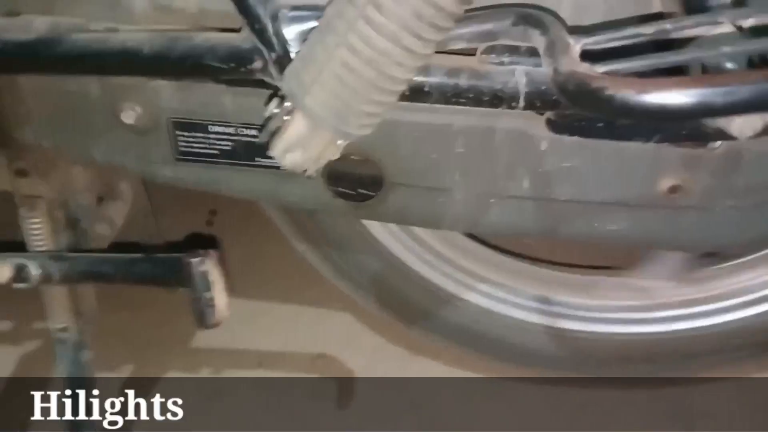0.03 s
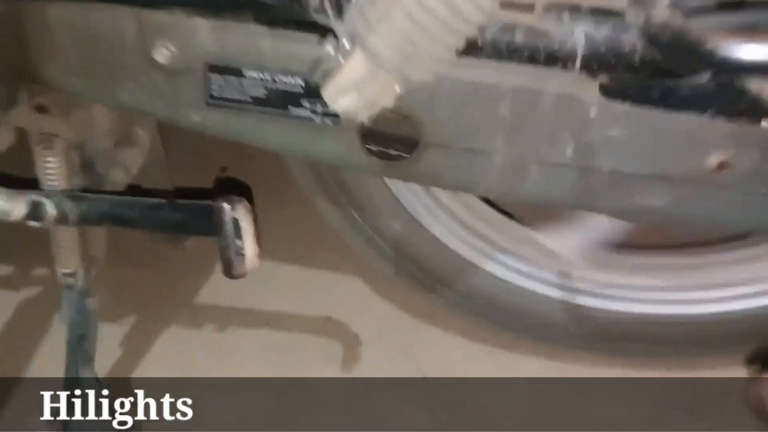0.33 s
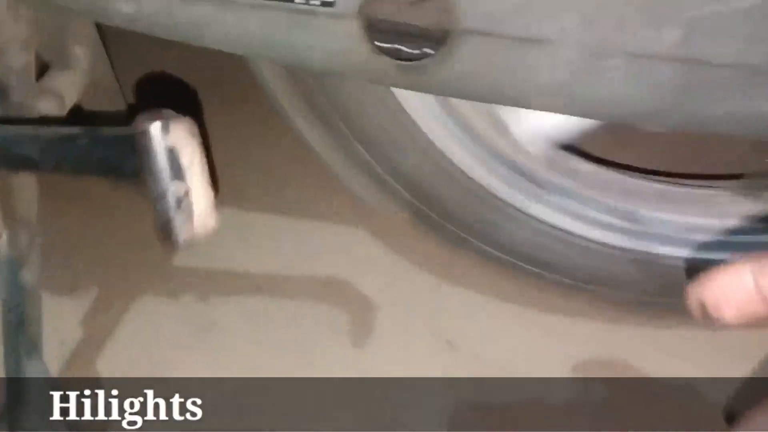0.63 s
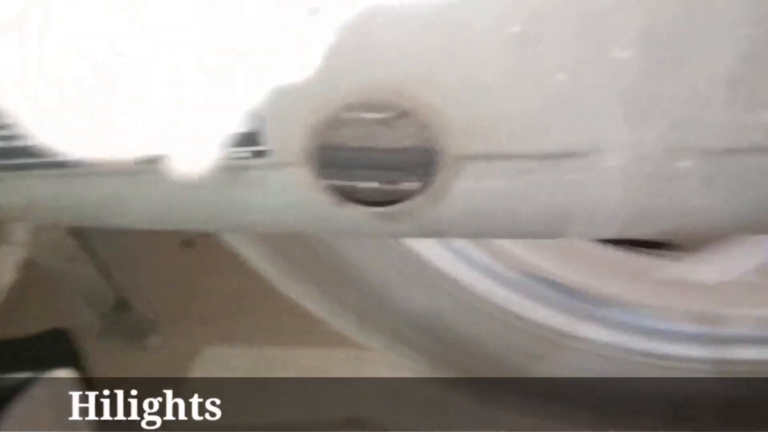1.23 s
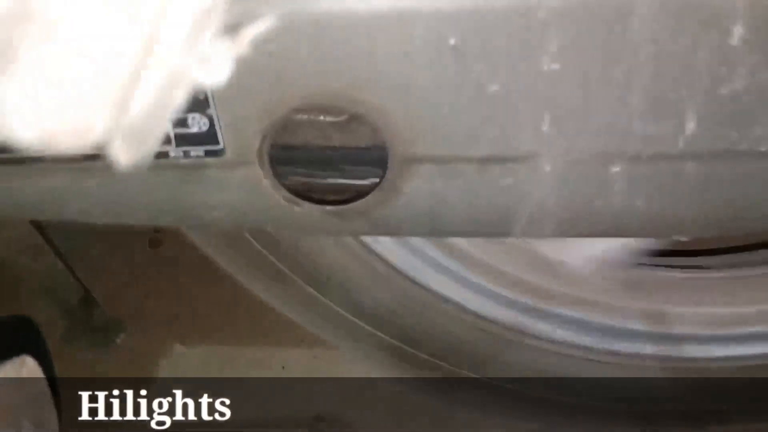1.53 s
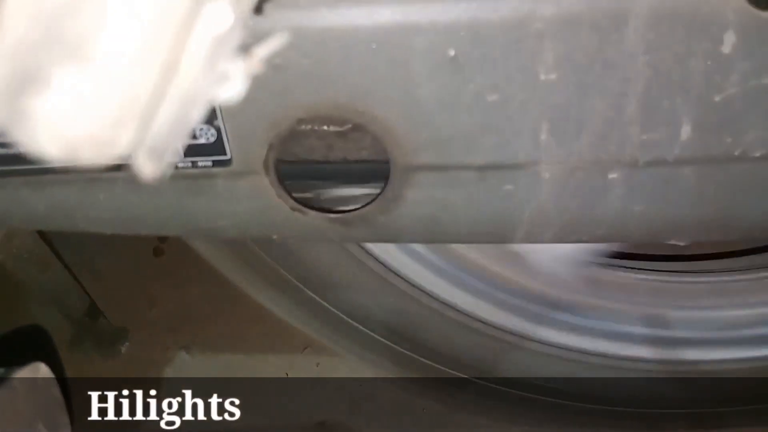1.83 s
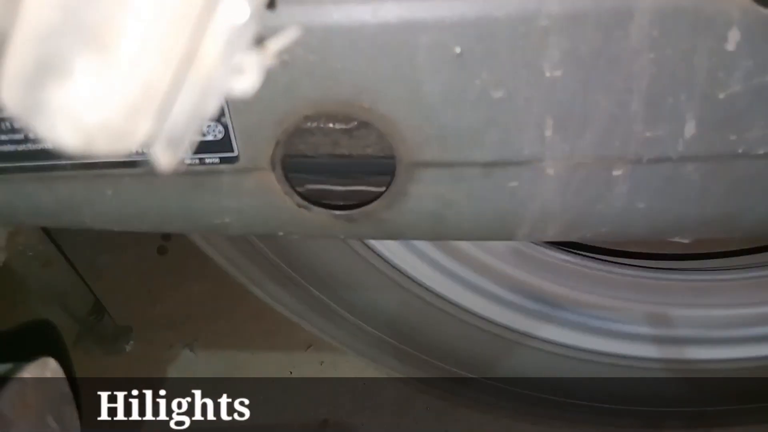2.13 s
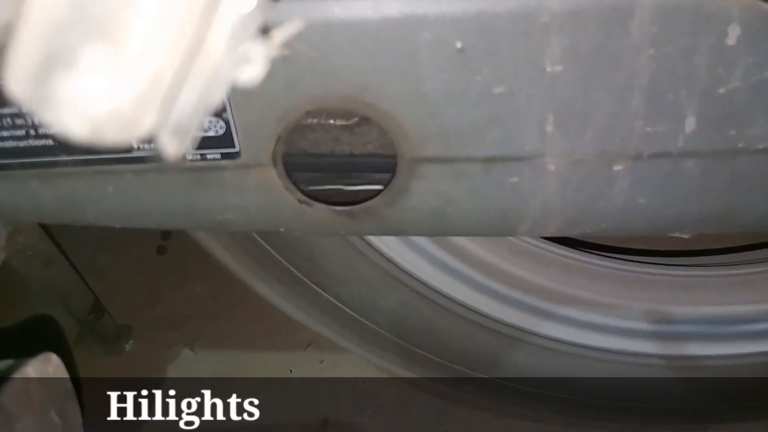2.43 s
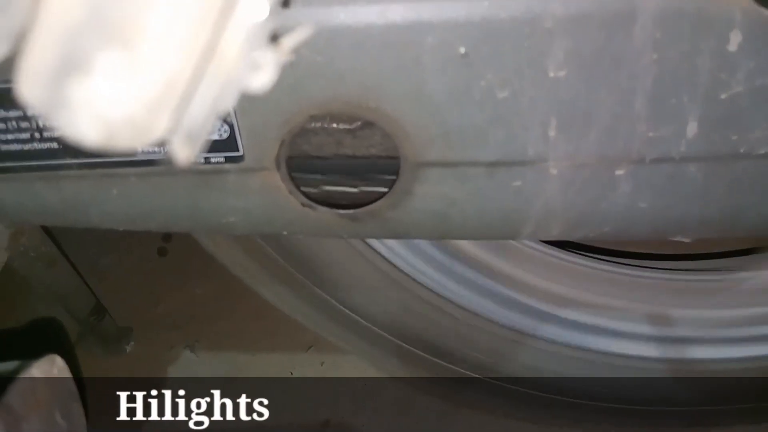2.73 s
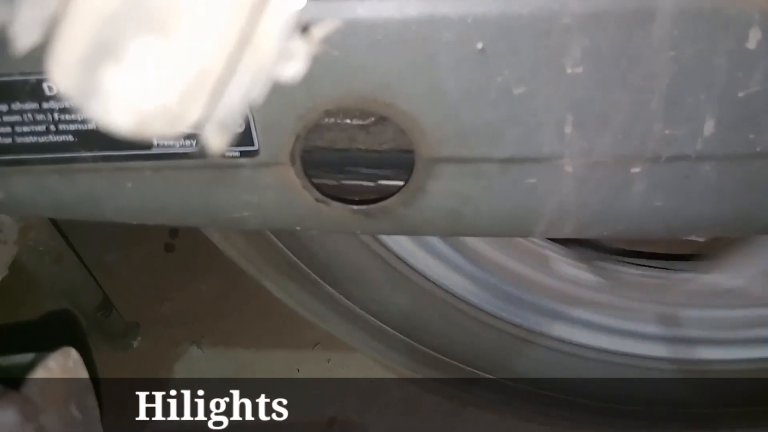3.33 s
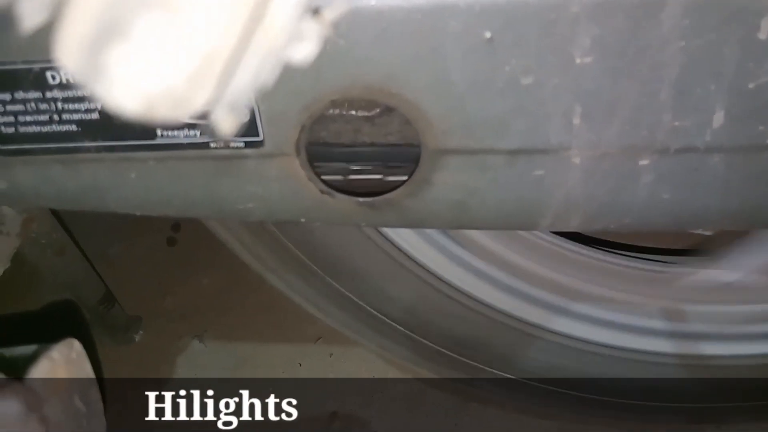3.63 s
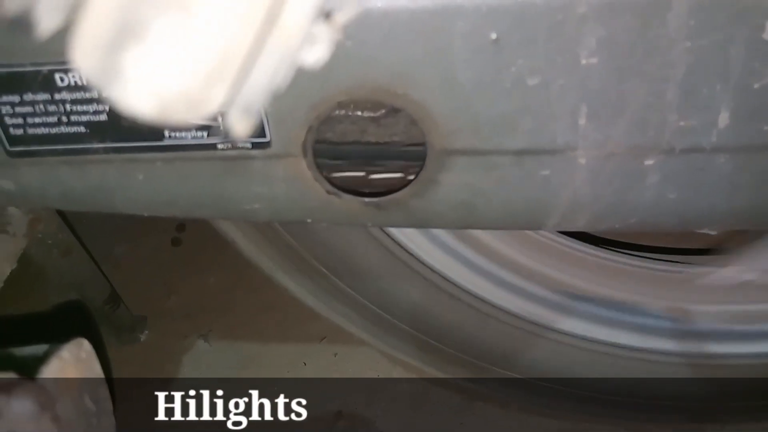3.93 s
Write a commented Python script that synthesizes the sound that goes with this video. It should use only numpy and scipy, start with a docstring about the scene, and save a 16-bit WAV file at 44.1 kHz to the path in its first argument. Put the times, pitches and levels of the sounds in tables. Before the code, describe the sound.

A motorcycle chain ticks rapidly and rattles close by as the spinning rear wheel gradually slows. The slack chain slaps, knocks and scrapes its ringing steel case and squeaks faintly twice, over a low drive rumble.

```python
"""Motorcycle chain running down

A motorcycle on its stand, the rear wheel spinning and slowly losing speed; one microphone, close to
the steel chain case. Every link ticks onto the sprocket and sets the case ringing. The slack chain
rattles, slaps, knocks and drags against it, snaps tight and squeaks twice. The drive rumbles
underneath, and the microphone is bumped once."""
import sys
import numpy as np
from scipy import signal
from scipy.fft import rfft, irfft
from scipy.io import wavfile
from scipy.ndimage import uniform_filter1d

SR = 44100
rng = np.random.default_rng(int(sys.argv[2]) if len(sys.argv) > 2 else 0)


def digitize_waveform(pressure):
    """Quantize a signal to 16-bit integers and store it at the path in sys.argv[1].

    Rows of a 2-D input are taken as channels; values are limited to [-1, 1].
    """
    field = np.atleast_2d(pressure).T
    bounded = np.clip(field, -1, 1)
    quanta = np.round(bounded * 32767).astype(np.int16)
    wavfile.write(sys.argv[1], SR, quanta)


N = 176400
TIME = np.arange(N) / SR
CUTOFF_HZ = 15700
MODE_SPREAD_DB = 2.2  # no two contacts excite a mode equally

# Modes of the hollow chain case: pitch_hz, level_db, t60_s
CASE_MODES = [(288, -22.5, 0.072), (396.2, -5.5, 0.11), (461, -5.5, 0.11), (505.7, -4, 0.17),
              (549.3, -4, 0.17), (739.6, -5.5, 0.093), (789.6, 0, 0.031), (872, -4, 0.12), (937, 1, 0.071),
              (1058.3, -5, 0.12), (1234, -7, 0.056), (1386, -11.5, 0.11), (1503, -7.5, 0.074)]


def from_db(db):
    """Decibels to gain."""
    return 10 ** (np.asarray(db) / 20)


def unit_rms(x):
    """Scale to unit power."""
    return x / np.sqrt(np.mean(x ** 2) + 1e-20)


def fader(rows):
    """Gain over time from rows of time_s, level_db."""
    return from_db(np.interp(TIME, *np.transpose(rows)))


def scatter(shape):
    """Normal random values, held within two standard deviations."""
    return np.clip(rng.standard_normal(shape), -2, 2)


def noise(colour):
    """Unit noise shaped by rows of freq_hz, density_db; it falls steeply below the first row."""
    hz, db = np.transpose(colour)
    log_hz = np.log(np.maximum(np.arange(N // 2 + 1) * SR / N, 1))
    bass_cut_db = 40 * np.maximum(np.log(hz[0]) - log_hz, 0)
    gain = from_db(np.interp(log_hz, np.log(hz), db) - bass_cut_db)
    return unit_rms(irfft(rfft(rng.standard_normal(N)) * gain, N))


def wobble(hz):
    """Random unit wavering up to the given rate."""
    lowpass = signal.butter(2, hz, fs=SR, output="sos")
    return unit_rms(signal.sosfilt(lowpass, rng.standard_normal(N)))


def impulses(times_s, db):
    """One impulse for each contact."""
    out = np.zeros(N)
    inside = (times_s >= 0) & (times_s < N / SR)
    np.add.at(out, (times_s[inside] * SR).astype(int), from_db(db)[inside])
    return out


def decay_envelope(hits, t60_s):
    """Envelope of contacts whose energy dies away."""
    energy_kept = from_db(-60 / (t60_s * SR)) ** 2
    return np.sqrt(signal.lfilter([1], [1, -energy_kept], hits ** 2 + 1e-18))


def bass_cut(x, low_hz=226):
    """Take away the bass below the given pitch."""
    return signal.sosfilt(signal.butter(2, low_hz, "high", fs=SR, output="sos"), x)


def blows(rows, modes, focus_db_per_oct, rebound_s, rebound_db):
    """The chain lands and rebounds; each blow shifts the modes to its pitch and favours those near it."""
    mode_hz, mode_db, t60_s = np.transpose(modes)[:, :, None]
    t = TIME[TIME < t60_s.max()]
    out = np.zeros(N + SR)
    for start_s, level_db, pitch_hz in rows:
        nearest_hz = mode_hz.flat[np.argmin(abs(np.log(mode_hz / pitch_hz)))]
        hz = mode_hz * pitch_hz / nearest_hz
        focused_db = level_db + mode_db - focus_db_per_oct * abs(np.log2(hz / pitch_hz))
        for delay_s, touch_db in ((0, 0), (rebound_s, rebound_db)):
            strength_db = focused_db + touch_db + MODE_SPREAD_DB * rng.uniform(-1, 1, hz.shape)
            polarity = rng.choice([-1, 1], hz.shape)
            ringing = polarity * from_db(strength_db - 60 * t / t60_s) * np.sin(2 * np.pi * hz * t)
            start = int((start_s + delay_s) * SR)
            out[start:start + len(t)] += ringing.sum(axis=0)
    return bass_cut(out[:N])


def drive_rumble(links, depth=.99):
    """Low running noise of the drive, throbbing with the links."""
    # Spectrum of the rumble: freq_hz, density_db
    colour = [(35, -48), (60, -9.5), (120, -6), (175, 2), (245, -11), (330, -7.5), (600, -3), (1500, -40.5)]
    throb = 1 - depth + depth * unit_rms(decay_envelope(links, t60_s=.11))
    return from_db(-44) * uniform_filter1d(throb, size=600) * noise(colour)


def microphone_bump(middle_s=.673, width_s=.0046, pitch_hz=125):
    """A soft, low thud on the microphone."""
    t = TIME - middle_s
    return from_db(-23) * np.exp(-.5 * (t / width_s) ** 2) * np.cos(2 * np.pi * pitch_hz * t)


def chain_drag(loose, start_s=1.114, end_s=1.361):
    """A grainy scrape sets in, holds and fades while the chain drags along the case."""
    # Spectrum of the scrape: freq_hz, density_db
    colour = [(330, -0.5), (430, 3), (1300, -1), (1800, -10.5), (5000, -60)]
    progress = np.clip((TIME - start_s) / (end_s - start_s), 0, 1)
    pressure = np.sqrt(abs(np.sin(np.pi * progress)))
    grain = unit_rms(decay_envelope(loose, t60_s=.06))
    return from_db(-31) * pressure * grain * noise(colour)


def case_swells():
    """The chain rubs the case and one of its resonances swells into a hollow, wavering hum."""
    # Rubs on the case: middle_s, length_s, level_db, pitch_hz
    rubs = [(.987, 0.019, -25, 535), (1.028, 0.055, -23, 515), (1.22, 0.078, -32, 306),
            (1.372, 0.041, -32, 293), (1.655, 0.17, -29.5, 527.3)]
    wavering_time = np.cumsum(1 + .0254 * wobble(hz=69)) / SR
    hum = np.zeros(N)
    for middle_s, length_s, level_db, pitch_hz in rubs:
        arch = np.cos(np.pi * np.clip((TIME - middle_s) / length_s, -.5, .5))
        hum += from_db(level_db) * arch * np.sin(2 * np.pi * pitch_hz * wavering_time)
    return hum * (1 + .3 * wobble(hz=55))


def link_squeaks(echo_db=-4, echo_t60_s=.04):
    """A dry link squeaks, steel on steel: a thin, rough glide that echoes briefly inside the case."""
    # Points along each squeak: time_s, pitch_hz, level_db
    glides = [
        [(1.856, 9500, -50), (1.860, 9860, -34), (1.865, 10100, -44), (1.869, 11600, -38), (1.878, 14000, -34),
         (1.884, 14400, -54)],
        [(3.492, 10000, -51), (3.497, 9600, -41), (3.500, 9150, -31), (3.506, 8400, -48)],
    ]
    direct = np.zeros(N)
    for glide in glides:
        times_s, hz, db = np.transpose(glide)
        pitch_hz = np.interp(TIME, times_s, hz) * (1 + .022 * wobble(hz=900))
        envelope = np.interp(TIME, times_s, from_db(db), left=0, right=0)
        flutter = 1 + .45 * wobble(hz=350)
        direct += envelope * flutter * np.sin(2 * np.pi * np.cumsum(pitch_hz) / SR)
    t = TIME[TIME < echo_t60_s]
    echo = rng.standard_normal(len(t)) * from_db(-60 * t / echo_t60_s)
    return direct + from_db(echo_db) * signal.fftconvolve(direct, echo / np.linalg.norm(echo))[:N]


def link_snaps(t60_s=.055):
    """A link snaps tight with a short, bright crack gathered around one pitch."""
    # Snaps of the chain: start_s, level_db, pitch_hz
    snaps = [(.307, -39.5, 7740), (.3526, -42, 7900), (.818, -34.5, 7300), (1.434, -30, 4430),
             (2.218, -33.5, 4130), (2.472, -41, 5700), (2.9442, -40.5, 4650), (3.1392, -35, 7900),
             (3.29, -40.5, 10200), (3.4206, -40, 10200)]
    out = np.zeros(N)
    for start_s, level_db, pitch_hz in snaps:
        band = signal.butter(1, [.93 * pitch_hz, 1.07 * pitch_hz], "band", fs=SR, output="sos")
        envelope = (TIME >= start_s) * from_db(level_db - 60 * abs(TIME - start_s) / t60_s)
        out += envelope * unit_rms(signal.sosfilt(band, rng.standard_normal(N)))
    return out


def chain_knocks():
    """The chain knocks on the wall of the case, dull and hollow."""
    # Knocks on the wall: start_s, level_db, pitch_hz
    knocks = [(.448, -23.5, 850), (.536, -23, 850), (1.163, -19.5, 466), (1.431, -31, 945),
              (2.043, -23, 927), (2.219, -22.5, 955), (2.776, -30, 965), (2.945, -29, 594),
              (3.005, -24, 894), (3.153, -23, 855), (3.457, -28, 704), (3.507, -20, 814), (3.577, -24, 853)]
    return from_db(-.5) * blows(knocks, CASE_MODES, focus_db_per_oct=14.5, rebound_s=.016, rebound_db=-7)


def chain_slaps():
    """The slack chain slaps the steel, which rings brightly."""
    # Slaps on the steel: start_s, level_db, pitch_hz
    slaps = [(0.4845, -25, 3110), (.631, -22.5, 2070), (0.844, -22.5, 1867), (0.8889, -20.5, 1910),
             (.946, -25.5, 2210), (1.055, -27, 2254), (1.0934, -19.5, 2603), (1.4304, -21, 2224),
             (1.604, -29, 3500), (1.659, -20, 3660), (2.044, -28, 2200), (2.2184, -27.5, 2366),
             (2.471, -27.5, 2430), (2.775, -30.5, 1876), (3.0315, -26, 2225), (3.153, -34, 2360),
             (3.355, -27, 2120), (3.752, -24, 2173), (3.815, -29.5, 1890)]
    # Modes of the steel where the chain lands: pitch_hz, level_db, t60_s
    steel_modes = [(1842, 0, .06), (2010, -1, .065), (2204, -2, .042), (2472, -2.5, .036), (2733, 2, .04),
                   (3158, 1.5, .022), (3596, -1.5, .038), (4085, 0, .034)]
    return from_db(-3) * blows(slaps, steel_modes, focus_db_per_oct=18, rebound_s=.0037, rebound_db=-6)


def loose_contacts(per_s=300, spread_db=6.5):
    """Loose rollers and plates touch at random."""
    touches = rng.random(N) < per_s / SR
    return touches * from_db(spread_db * scatter(N)) * rng.choice([-1, 1], N)


def roller_rattle(loose):
    """Fine clatter of the loose rollers: each touch is a dying burst of noise."""
    # Strength of the rattle: time_s, level_db
    strength = [(.23, -34.5), (1.25, -36.5), (2.2, -41.5), (2.7, -44), (3.2, -39), (3.95, -45.5)]
    # Spectrum of the rattle: freq_hz, density_db
    colour = [(350, 1.5), (700, 14.5), (1200, 10.5), (1600, 3.5), (2000, 4.5), (3300, -0.5), (5200, -17),
              (7000, -16.5), (7900, -9.5), (9000, -19), (15000, -39)]
    return from_db(1) * fader(strength) * unit_rms(decay_envelope(loose, t60_s=.081)) * noise(colour)


def link_contacts(links_per_s=40.55, slowing_per_s2=3.03, jitter_s=.001):
    """Links meet the sprocket at a steadily falling rate; each roller then seats with a weaker touch."""
    links_passed = links_per_s * TIME - slowing_per_s2 * TIME ** 2 / 2
    link = np.arange(int(links_passed[-1]) + 1)
    meet_lag, seat_lag, meet_force, seat_force = rng.standard_normal((len(link), 4)).T
    meet_s = np.interp(link, links_passed, TIME) + jitter_s * meet_lag
    seat_s = np.interp(link + .52 + .17 * seat_lag, links_passed, TIME)  # about half a link later
    return impulses(meet_s, db=1.8 * meet_force) + impulses(seat_s, db=-11 + 4.5 * seat_force)


def link_ticks(links, rise_s=.0014, tint_db=3.6):
    """Each link ticks on the sprocket, short and bright, with its own tint in every band."""
    # Strength of the ticks: time_s, level_db
    strength = [(.23, -47.5), (1.2, -47), (3.2, -49), (3.97, -51.5)]
    # Spectrum of a tick: freq_hz, density_db
    colour = [(500, 3.5), (1200, 14.5), (2400, 6), (4200, 7.5), (5300, -0.5), (6800, -2.5), (7900, 5),
              (9000, -1.5), (12300, -6), (14000, 1.5), (15500, -4)]
    edges_hz = np.r_[0, np.geomspace(1600, CUTOFF_HZ, num=11)]
    hz = np.arange(N // 2 + 1) * SR / N
    rise_pole = np.exp(-1 / (rise_s * SR))
    spectrum = rfft(noise(colour))
    out = np.zeros(N)
    for low, high in zip(edges_hz, edges_hz[1:]):
        tinted = links * from_db(tint_db * scatter(N))
        envelope = signal.lfilter([1 - rise_pole], [1, -rise_pole], decay_envelope(tinted, t60_s=.036))
        out += envelope * irfft(spectrum * (hz >= low) * (hz < high), N)
    return from_db(5) * fader(strength) * unit_rms(out)


def chain_case(links, loose):
    """The hollow case rings as every contact strikes each mode with a strength of its own."""
    # How hard the chain shakes the case: time_s, level_db
    shake = [(.23, -37.5), (.75, -38), (.85, -34), (1.45, -35), (1.76, -39.5), (1.83, -32.5), (2.25, -34),
             (2.4, -36), (2.88, -42), (3.0, -35), (3.25, -36.5), (3.38, -40), (3.6, -36), (3.9, -44)]
    hits = links + from_db(-9.5) * loose
    struck = np.flatnonzero(hits)
    spread_db = MODE_SPREAD_DB * scatter((4096, len(CASE_MODES)))
    ringing = np.zeros(N)
    for k, (pitch_hz, level_db, t60_s) in enumerate(CASE_MODES):
        force = hits + 1e-18
        force[struck] *= from_db(level_db + np.resize(spread_db[:, k], len(struck)))
        radius, angle = from_db(-60 / (t60_s * SR)), 2 * np.pi * pitch_hz / SR
        poles = [1, -2 * radius * np.cos(angle), radius ** 2]
        ringing += (-1) ** k * signal.lfilter([0, np.sin(angle)], poles, force)
    return from_db(1.5) * fader(shake) * unit_rms(bass_cut(ringing))


def scene():
    """All sources at one microphone, close to the chain case."""
    links, loose = link_contacts(), loose_contacts()
    running = link_ticks(links) + roller_rattle(loose) + chain_case(links, loose) + drive_rumble(links)
    slack = chain_drag(loose) + chain_slaps() + link_snaps() + chain_knocks() + case_swells()
    return (running + slack + link_squeaks() + microphone_bump())[None]


def record(dry):
    """A moment of silence, a quick fade-in, and a steep cut of the top treble."""
    # Opening fade: time_s, level_db
    fade_in = [(.17, -52), (.205, -15), (.222, -0.5)]
    opened = dry * fader(fade_in) * (TIME > fade_in[0][0])
    lowpass = signal.ellip(10, .2, 80, CUTOFF_HZ, fs=SR, output="sos")
    return signal.sosfilt(lowpass, opened)


dry = scene()
out = record(dry)
digitize_waveform(out)
```